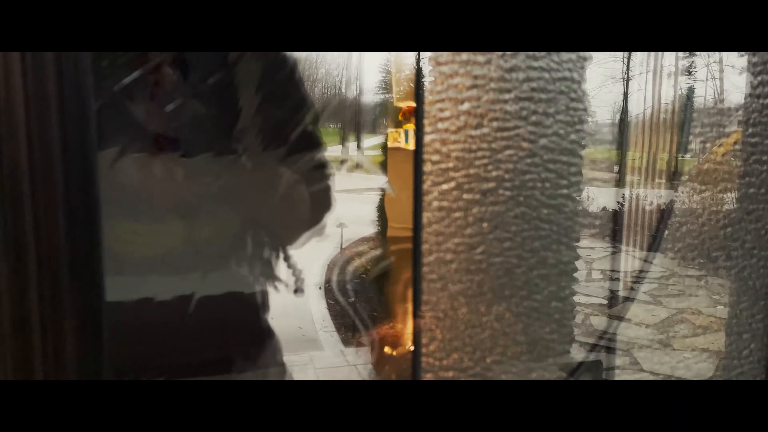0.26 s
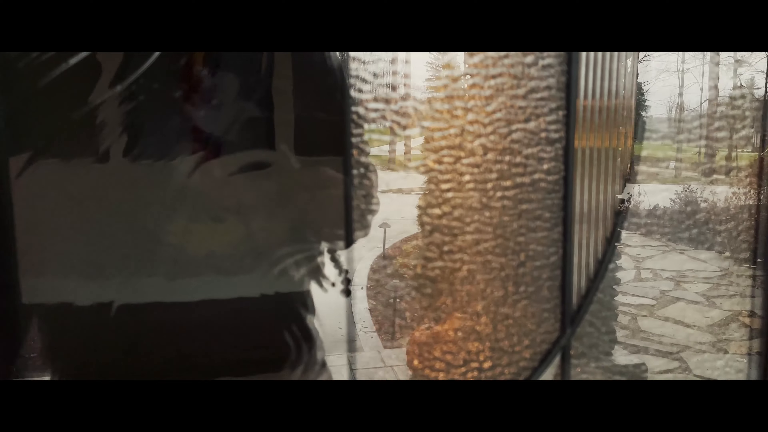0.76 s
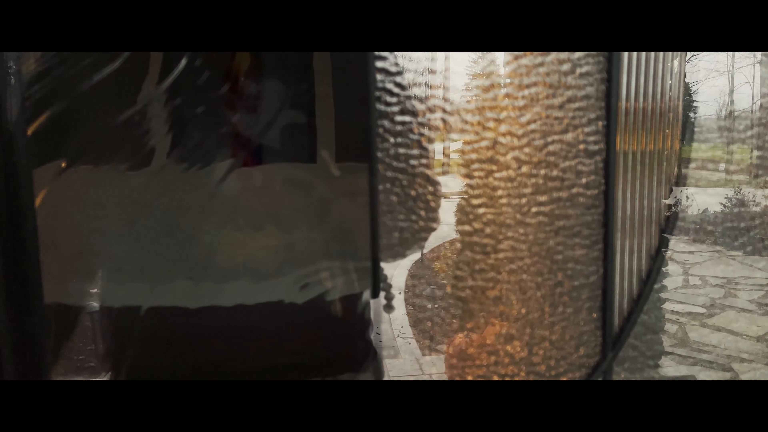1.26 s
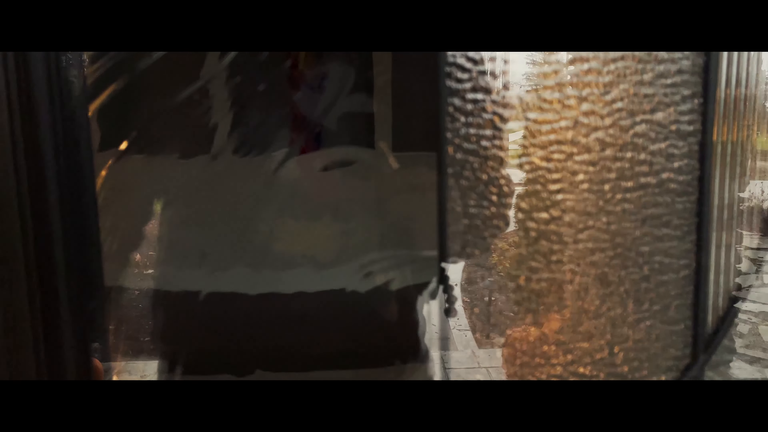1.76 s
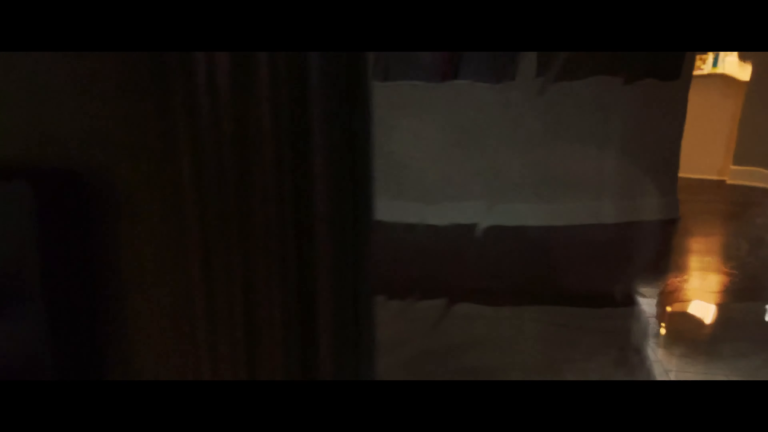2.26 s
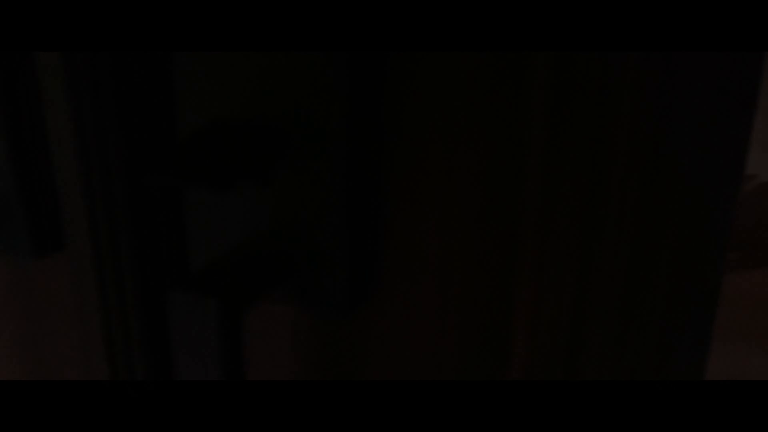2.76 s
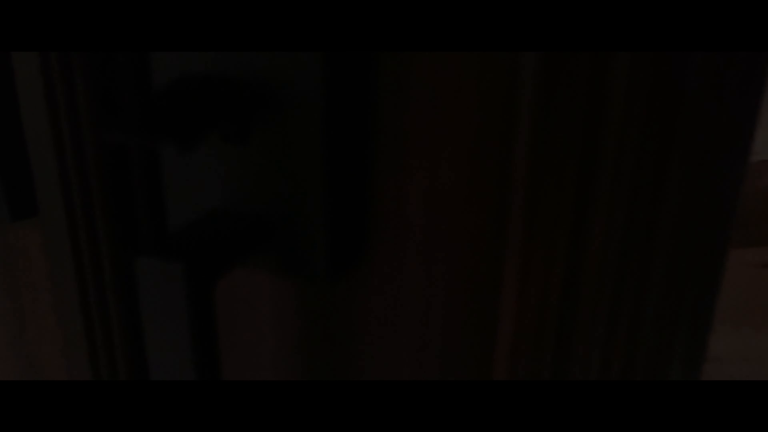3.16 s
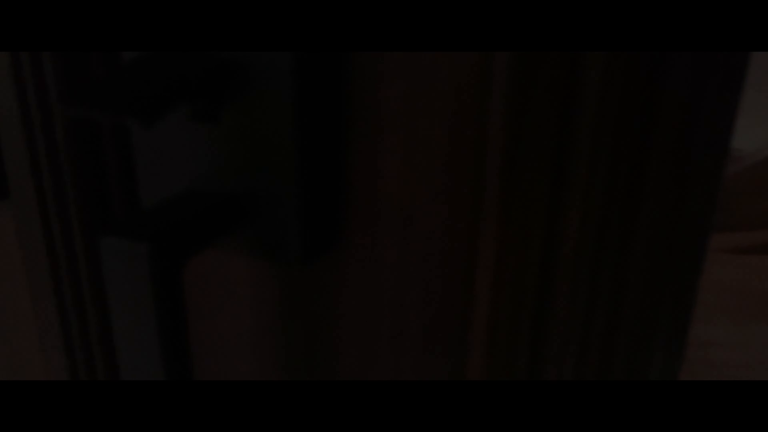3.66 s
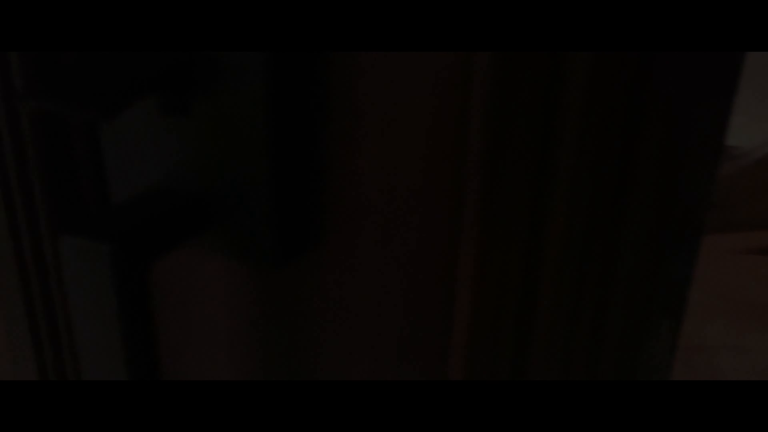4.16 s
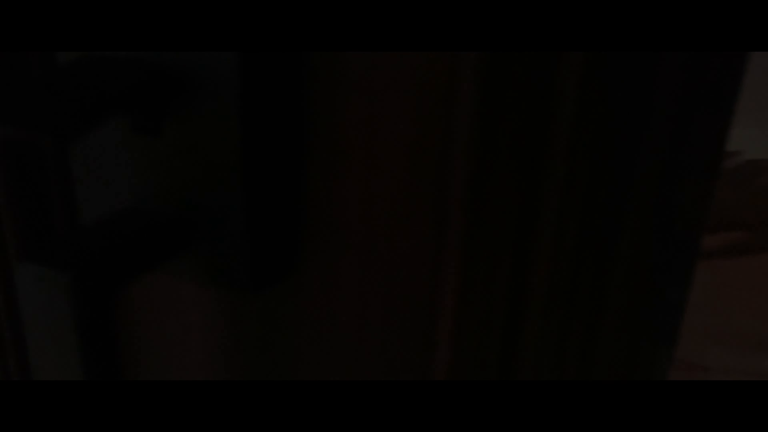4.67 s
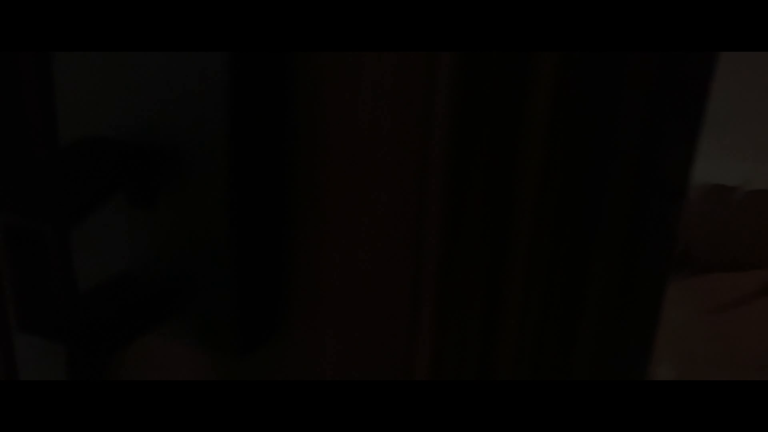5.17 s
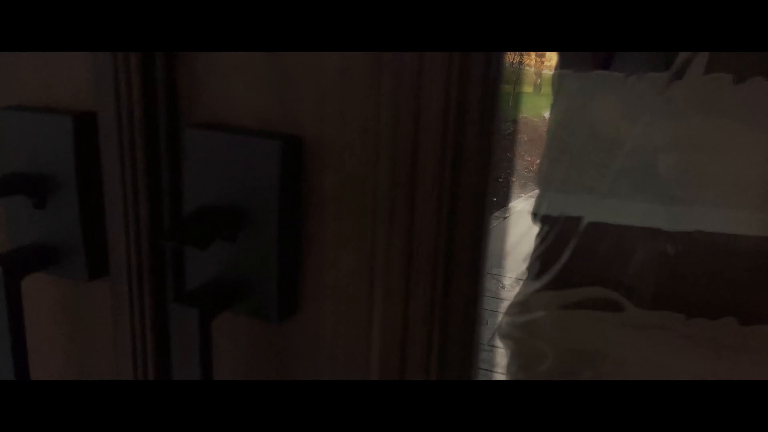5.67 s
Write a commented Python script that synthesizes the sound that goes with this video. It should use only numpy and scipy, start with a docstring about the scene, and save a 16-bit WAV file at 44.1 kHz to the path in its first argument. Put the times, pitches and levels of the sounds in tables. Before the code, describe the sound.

Shoes scuff, boards click and a dull footfall thuds above a faint falling hum; after a lull, seven firm knocks shake a wooden front door.

```python
"""First a low hum is heard, sinking in pitch as a motor runs down, while shoes brush the floor and sleeves rustle.
Floorboards click and a footfall thuds; the phone ticks in the hand that carries it through a quiet hallway.
Then seven knuckle knocks ring a wooden front door, shake its latch and die away in the hall.
Door, boards and phone case are sums of fading sine waves; latch, cloth and soles are shaped noise."""
import sys
import numpy as np
from scipy import signal
from scipy.fft import rfft, irfft, next_fast_len
from scipy.io import wavfile
from scipy.ndimage import uniform_filter1d

SR = 44100
rng = np.random.default_rng(int(sys.argv[2]) if len(sys.argv) > 2 else 0)


def transcribe(signal):
    """Save signal, clipped to [-1, 1], as a 16-bit WAV file at the path in sys.argv[1]."""
    frames = np.atleast_2d(signal).T
    limited = np.clip(frames, -1, 1)
    pcm = np.round(limited * 32767).astype(np.int16)
    wavfile.write(sys.argv[1], SR, pcm)


N = 261056
TIME = np.arange(N) / SR
RING = TIME[:SR]  # one second, for single sounds
BRIEF = RING[:SR // 8]  # an eighth of a second, for tiny sounds
SIDES = np.array([[.5], [-.5]])  # left and right: times x dB, left ends up x dB above right


def undb(db):
    """Turn decibels into a gain."""
    return 10 ** (np.asarray(db) / 20)


def fade(t60, t=RING):
    """Envelope that loses 60 dB in t60 seconds."""
    return np.exp(-np.log(1000) * t / t60)


def add(out, s, sound):
    """Mix a sound in at s seconds."""
    i = max(int(s * SR), 0)
    out[:, i:i + sound.shape[-1]] += sound[..., :N - i]


def colour(x, points):
    """Filter by an outline of (f/Hz, level/dB) points; white noise keeps its power, so only the shape counts."""
    hz, db = np.transpose(points)
    size = next_fast_len(x.shape[-1])
    f = np.maximum(np.fft.rfftfreq(size, 1 / SR), 1)
    gain = undb(np.interp(np.log(f), np.log(hz), db))
    gain = gain / np.sqrt(np.mean(gain ** 2))
    return irfft(rfft(x, size) * gain, size)[..., :x.shape[-1]]


def noise(size, apart):
    """White noise at two microphones: apart 0 is alike on both, 1 is unrelated."""
    mid, side = rng.standard_normal((2, size))
    return (mid + 2 * SIDES * apart * side) / np.hypot(1, apart)


def walk(rate):
    """Random drift with about `rate` new values a second, smoothed, with a spread of 1."""
    k = int(SR / rate)
    steps = np.repeat(rng.standard_normal(N // k + 1), k)
    drift = uniform_filter1d(uniform_filter1d(steps, k), k)[:N]
    return drift / np.std(drift)


# Ways the door leaf and the air before it vibrate: (f/Hz, level/dB, time to fade by 60 dB t60/s,
# left minus right/dB, which shrinks below 300 Hz)
DOOR_MODES = [(70.5, 4.5, 0.049, -2.5), (105, -13.5, 0.014, -2), (170, -7.5, 0.068, 4),
              (197.2, -11.5, 0.12, 0), (274, -24.5, 0.12, 3), (318.6, -11.5, 0.036, 18.5),
              (332, -46.5, 0.87, -13), (360.4, -6, 0.039, -10), (367, -52, 0.67, 19), (469, -23, 0.07, 0),
              (554, -16.5, 0.055, 5.5), (586.4, -14, 0.043, -7.5), (657.7, -20.5, 0.13, -0.5),
              (742.6, -21, 0.083, 8.5), (863, -34.5, 0.095, -13.5), (908, -25.5, 0.056, 8),
              (931, -16, 0.02, 5), (1090, -19, 0.017, -1), (1245, -35.5, 0.064, 6), (1550, -46, 0.066, -2)]
TRAVEL_S = 0.01018  # a 100 Hz bending wave takes this long to arrive
PORT_LAG_S = 0.00075  # from left to right, shorter below 800 Hz
RISE_CYCLES = 1.554  # time constant of a mode's swelling, in cycles


def knock(hardness_db, spot_db=0.7):
    """One blow: bending waves bring the high modes first, the boom last, and reach the left side sooner."""
    out = 0
    for hz, db, t60, pan_db in DOOR_MODES:
        arrival = TRAVEL_S * np.sqrt(100 / hz) - SIDES * PORT_LAG_S * min(hz / 800, 1)
        t = np.maximum(RING - arrival, 0)
        # long waves reach both sides almost equally loud
        tilt_db = SIDES * pan_db * min(hz / 300, 1) ** 2
        # a harder blow favours the high modes
        blow_db = hardness_db * np.log2(hz / 300)
        # the knuckles never land on quite the same spot
        chance_db = spot_db * rng.standard_normal()
        swell = 1 - np.exp(-t * hz / RISE_CYCLES)
        out = out + undb(db + tilt_db + blow_db + chance_db) * np.sin(2 * np.pi * hz * t) * fade(t60, t) * swell
    return out


# Knuckle knocks: (t/s, level/dB, hardness of the blow/dB per octave, latch rattle level/dB,
# time until the latch drops back/s)
KNOCK_EVENTS = [(3.4515, -5, 0, 1.5, 0.14), (3.729, -2.5, 1.4, 3, 0.15), (4.0503, -7, -2, 1.5, 0.2),
                (4.3785, 0.5, 3.5, 4, 0.21), (4.7180, -2, 2.9, 2.5, .169), (5.063, -2.5, 1.06, 3.5, 0.19),
                (5.3335, -1.95, 3.5, 3, 0.23)]


def knocks():
    """Knuckles strike the door leaf, each blow with its own loudness and hardness."""
    door = np.zeros((2, N))
    for s, db, hardness_db, *_ in KNOCK_EVENTS:
        add(door, s, undb(db) * knock(hardness_db))
    return door


def clack(t60, low_hz=2200, high_hz=4210, sharpness=10.7, ring_db=7):
    """One brief contact of loose metal: a burst of noise that also rings at a pitch of its own."""
    hit = fade(t60, BRIEF) * noise(len(BRIEF), 0.99)
    resonance = signal.iirpeak(rng.uniform(low_hz, high_hz), sharpness, SR)
    return hit + undb(ring_db) * signal.lfilter(*resonance, hit)


# Loose fittings chattering after a knock: (t after the blow/s, level/dB, fade t60/s)
LATCH_CHATTER = [(.004, -2.5, 0.11), (.014, 6, 0.1), (.035, 2.5, 0.086), (.069, 1, 0.069)]
# Tone of the chatter: (f/Hz, level/dB)
CHATTER_TONE = [(900, 9.5), (1600, 2), (2500, -3.5), (3800, -9.5), (6000, -11), (7500, -18), (11000, -21.5),
                (13000, -36)]
# Tone of the settling taps: (f/Hz, level/dB)
SETTLING_TONE = [(1200, 9.5), (2800, 4), (4400, 4), (6000, -31), (12000, -42)]


def latch(rattle_db=-52.0, settle_db=-11, drop_db=-9, tap_t60=0.043, dying_db_per_s=42, count=7):
    """Loose metal chatters after each knock, settles in a run of taps that tend to weaken, and drops back."""
    chatter, taps = np.zeros((2, 2, N))
    for s, _, _, shake_db, drop_s in KNOCK_EVENTS:
        for delay, db, t60 in LATCH_CHATTER:
            uneven = rng.uniform(.92, 1.06)
            add(chatter, s + delay * uneven, undb(shake_db + db) * clack(t60))
        gaps = rng.uniform(.008, .038, count)
        for delay in .04 + np.cumsum(gaps):
            tap = undb(rng.normal(0, 3.3)) * clack(.025)
            add(taps, s + delay, undb(shake_db + settle_db - dying_db_per_s * delay) * tap)
        add(taps, s + drop_s, undb(shake_db + drop_db) * clack(tap_t60))
    return undb(rattle_db + SIDES * 2.5) * (colour(chatter, CHATTER_TONE) + colour(taps, SETTLING_TONE))


# Clicks of the floor underfoot: (t/s, level/dB, pitch of the joint f/Hz)
FLOOR_CLICKS = [(.376, -37, 1680), (.422, -49, 2670), (.549, -37.5, 1450), (.563, -29, 2974),
                (.71, -36, 930), (1.42, -44, 2500), (1.458, -51, 3150), (1.483, -37.5, 3010),
                (1.573, -31, 1010), (1.631, -53.5, 4570), (5.762, -46, 3100), (5.773, -50, 2900)]
# A joint rings with the board under it: (multiple of the joint's pitch, level/dB, fade t60/s)
JOINT_MODES = [(1, -1, 0.022), (.5, -5.5, 0.061)]
# Footfalls: (t/s, boom of the boards level/dB, thump of the heel level/dB)
FOOTFALLS = [(0.423, -21.5, 2), (0.57, -2, 2.5)]
# Boom of the boards: (f/Hz, level/dB, fade t60/s)
BOARD_MODES = [(83, -35.5, 0.54), (146, -30.5, 0.15), (239, -44.5, 0.15), (388.6, -35.5, 0.14)]
# Tone of the heel's thump: (f/Hz, level/dB)
THUMP_TONE = [(40, 9.5), (90, 3.5), (170, -6.5), (310, -4), (600, -19), (1500, -29), (4000, -63)]


def footsteps(crack_db=-4, thump_db=-39, thump_t60=0.14, pan_db=6.0, press_s=0.0024, joint_rise_cycles=1.15):
    """Weight comes down on the floor: it booms, and each joint cracks and rings briefly."""
    out = np.zeros((2, N))
    for s, db, joint_hz in FLOOR_CLICKS:
        for multiple, mode_db, t60 in JOINT_MODES:
            hz = multiple * joint_hz
            crack_tone = [(hz / 4, -16), (hz, 0), (2 * hz, -9), (4 * hz, -26), (10 * hz, -55)]
            crack = colour(noise(SR, 1.0), crack_tone)
            ring = np.sin(2 * np.pi * hz * RING) / 2
            envelope = fade(t60) * (1 - np.exp(-RING * hz / joint_rise_cycles))
            add(out, s, undb(db + mode_db + SIDES * pan_db) * (ring + undb(crack_db) * crack) * envelope)
    boom = sum(undb(db) * np.sin(2 * np.pi * hz * RING) * fade(t60) for hz, db, t60 in BOARD_MODES)
    press = 1 - np.exp(-RING / press_s)  # the weight arrives softly
    for s, boom_db, heel_db in FOOTFALLS:
        thump = undb(heel_db + thump_db) * colour(noise(SR, 0.067), THUMP_TONE) * fade(thump_t60)
        add(out, s, (undb(boom_db) * boom + thump) * press)
    return out


# Ticks of the phone case in the hand: (t/s, click level/dB, ring of the case level/dB)
CASE_TICKS = [(0.324, -49.5, -52), (.377, -37.5, -49), (.409, -61, -34), (.421, -34, -38), (.759, -45, -48),
              (1.47, -57, -50), (2.246, -51, -41), (2.267, -49, -35), (2.352, -53, -38), (2.692, -56, -44),
              (4.906, -77, -53), (5.105, -62, -47), (5.133, -46.5, -44), (5.152, -64, -33.5),
              (5.491, -56, -47.5), (5.528, -48.5, -43.5), (5.611, -55.5, -43.5), (5.639, -52.5, -56),
              (5.747, -69, -46)]
# Ways the case vibrates: (f/Hz, level/dB, fade t60/s)
CASE_MODES = [(9160, -3.5, 0.014), (11240, -5, 0.029), (12200, -28, .008), (14700, -38, .015)]
# Tone of the clicks on the case and of the sliding cloth: (f/Hz, level/dB)
CLOTH_TONE = [(500, -23), (1200, 5.5), (2200, 1.5), (5000, -0.5), (7500, -1.5), (9200, 2.5), (11400, 3.5),
              (12400, -15), (14000, -32)]


def handling(regrip_from_s=5.4, regrip_to_s=5.85, regrip_db=-56, spread_db=3, count=18,
             jolt_db=-48.5, click_share_db=-7, click_t60=.022, contact_t60=.003):
    """Fingers click on the case and ring it: single ticks, a flurry as the grip shifts, a jolt with every knock."""
    clicks, rings = np.zeros((2, 2, N))
    ring = sum(undb(db) * np.sin(2 * np.pi * hz * BRIEF) * fade(t60, BRIEF) for hz, db, t60 in CASE_MODES)
    flurry = [(rng.uniform(regrip_from_s, regrip_to_s), regrip_db + spread_db * rng.standard_normal())
              for _ in range(count)]
    jolts = [(s + TRAVEL_S / 2, jolt_db) for s, *_ in KNOCK_EVENTS]
    extra_ticks = [(s, db + click_share_db, db) for s, db in flurry + jolts]
    for s, click_db, ring_db in CASE_TICKS + extra_ticks:
        add(clicks, s, undb(click_db) * fade(click_t60, BRIEF) * noise(len(BRIEF), 0.72))
        # each contact is a tiny scrape, so it stirs the modes differently
        contact = fade(contact_t60, BRIEF) * noise(len(BRIEF), 0.85)
        contact = contact / np.linalg.norm(contact[0])
        add(rings, s, undb(ring_db) * signal.fftconvolve(contact, ring[None], axes=1))
    return rings + colour(clicks, CLOTH_TONE)


def stroke(t, length):
    """Envelope of one rubbing movement: fastest at t = 0, above half strength for length seconds."""
    return 1 / np.cosh(np.clip(2 * np.arccosh(2) * t / length, -20, 20))


# Sleeves sliding as the arm moves: (t of the fastest moment/s, length/s, level/dB)
SLEEVE_MOVES = [(.17, 0.27, -67.5), (0.415, 0.061, -52.5), (0.65, .16, -67), (0.8, 0.051, -65),
                (1.604, 0.78, -82), (2.284, 0.17, -67.5), (2.54, 0.27, -70.5), (2.996, 1, -89.5),
                (5.172, 0.17, -68.5), (5.366, 0.22, -77), (5.847, 0.34, -62)]


def sleeves(rest_db=-85.5, grain_db=1.5, snag_db=8, snag_spread_db=8, snag_t60=.008, count=70):
    """Cloth slides unevenly with each move of the arm; now and then a fold snags and slips."""
    moves = sum((undb(db) * stroke(TIME - s, length)) ** 2 for s, length, db in SLEEVE_MOVES)
    speed = undb(rest_db) + np.sqrt(moves)  # rest_db: the sleeve of an arm held still
    rub = noise(N, 0.53) * undb(grain_db * walk(100))
    for s in rng.uniform(0, N / SR, count):
        snag = fade(snag_t60, BRIEF) * noise(len(BRIEF), 0.66)
        add(rub, s, undb(snag_db - snag_spread_db * rng.random()) * snag)
    return colour(speed * rub, CLOTH_TONE)


# Soles brushing the floor: (t of the fastest moment/s, length/s, level/dB, brightness/dB per octave)
SOLE_STROKES = [(.18, 0.085, -50.5, -0.5), (0.409, 0.12, -46.5, -1.5), (.595, 0.12, -44, -1),
                (0.81, 0.07, -44.5, 2.3), (1.33, 0.44, -56.5, 1.63), (1.923, 0.22, -62.5, 0.5),
                (2.188, .2, -60.5, 1.3), (2.53, 0.18, -59, 1.5), (5.247, 0.26, -67, 3),
                (5.84, 0.17, -56, 4.5)]
# Tone of a sole on the floor, before the brightness: (f/Hz, level/dB)
SOLE_TONE = [(200, 5.5), (550, 8.5), (900, 7.5), (1400, -2), (2400, -9), (3300, -13), (4600, -12),
             (7000, -27), (12000, -70)]


def soles(grain_db=3.3, pan_db=4):
    """Shoes brush the floor in short, grainy strokes, some brighter than others."""
    out = np.zeros((2, N))
    for s, length, db, bright_db in SOLE_STROKES:
        start = max(s - .5, 0)
        grain = grain_db * walk(92.8)[:SR]
        rub = noise(SR, 1.0) * stroke(RING + start - s, length) * undb(db + grain + SIDES * pan_db)
        tone = [(hz, level + bright_db * np.log2(hz)) for hz, level in SOLE_TONE]
        add(out, start, colour(rub, tone))
    return out


def motor(start_hz=75.7, sag_hz_per_s=4.35, start_db=-44.5, swell_db_per_s=0.4, waver_db=-2.0):
    """An unbalanced shaft hums as it slows at an even rate; the wavering hum swells a little as it sinks."""
    hz = start_hz - sag_hz_per_s * TIME
    level_db = start_db + swell_db_per_s * TIME + waver_db * walk(16)
    return undb(level_db) * np.sin(2 * np.pi * np.cumsum(hz) / SR)


# Tone of the still air in the house: (f/Hz, level per Hz/dB)
HOUSE_TONE = [(20, -20), (33, -18), (48, 4), (62, -2.5), (85, -4.5), (105, -7), (130, -5.5), (200, -15.5),
              (300, -19.5), (500, -21), (900, -24.5), (1500, -31.5), (3000, -52.5), (14000, -85)]


def house(level_db=-52, wide_hz=450):
    """Still air of the house: the rumble is alike on both sides, the hiss is wide."""
    mid, side = colour(rng.standard_normal((2, N)), HOUSE_TONE)
    side = signal.sosfilt(signal.butter(1, wide_hz, "high", fs=SR, output="sos"), side)
    return undb(level_db + .5 * walk(2.4) + SIDES * 2.0) * (mid + 2.5 * SIDES * side)


# Tone of the hallway's reflections: (f/Hz, level/dB)
HALL_TONE = [(50, 10), (150, 7.5), (330, 7), (600, 3.5), (900, 0.5), (1400, -1), (3000, -6.5),
             (12000, -11.5)]


def hall(x, wet_db, t60, first_s=0.0022):
    """Dense reflections of the hallway build up after the first wall echo, then fade."""
    envelope = fade(t60) * (1 - np.exp(-(RING / first_s) ** 4))
    response = colour(noise(SR, 0.32), HALL_TONE) * envelope / np.sqrt(np.sum(envelope ** 2))
    return undb(wet_db + SIDES * 1.55) * signal.fftconvolve(x, response, axes=1)[:, :N]


def scene():
    """Door, latch and footsteps sound into the hall; handling, sleeves and soles are near the microphones."""
    door = knocks()
    small = latch() + footsteps()
    echoes = hall(door, wet_db=-20.5, t60=0.34) + hall(small, wet_db=-9.5, t60=0.32)
    near = handling() + sleeves() + soles()
    return door + small + echoes + near + motor() + house()


def record(dry, port_hz=10300, port_width_hz=1500, low_cut_hz=36, top_hz=14800):
    """The two microphone ports fall out of phase around their resonance; rumble and the top are cut."""
    notch = signal.lfilter(*signal.iirnotch(port_hz, port_hz / port_width_hz, SR), dry[1])
    # twice the notch minus the input turns the phase but keeps the level
    ports = np.array([dry[0], 2 * notch - dry[1]])
    ports = signal.sosfilt(signal.butter(2, low_cut_hz, "high", fs=SR, output="sos"), ports)
    return signal.sosfilt(signal.ellip(8, .2, 70, top_hz, fs=SR, output="sos"), ports)


dry = scene()
out = record(dry)
transcribe(out)
```